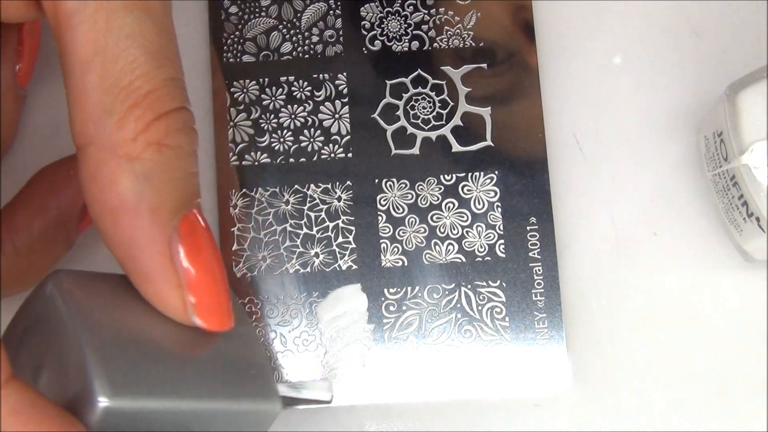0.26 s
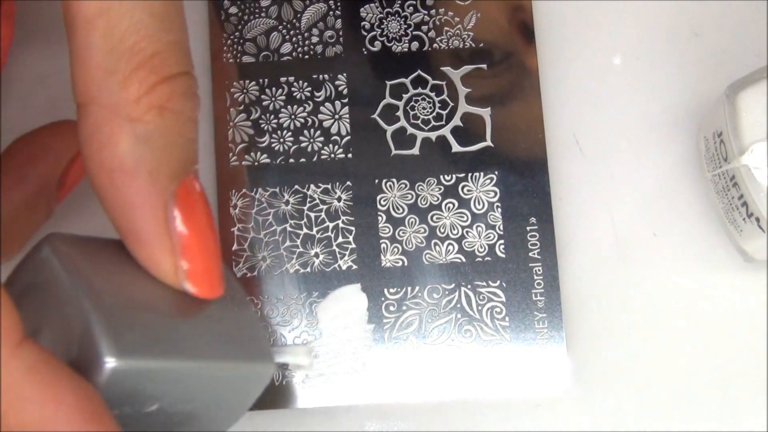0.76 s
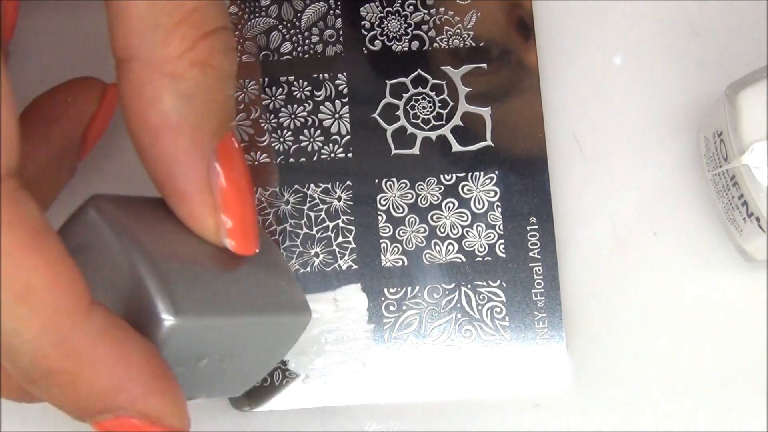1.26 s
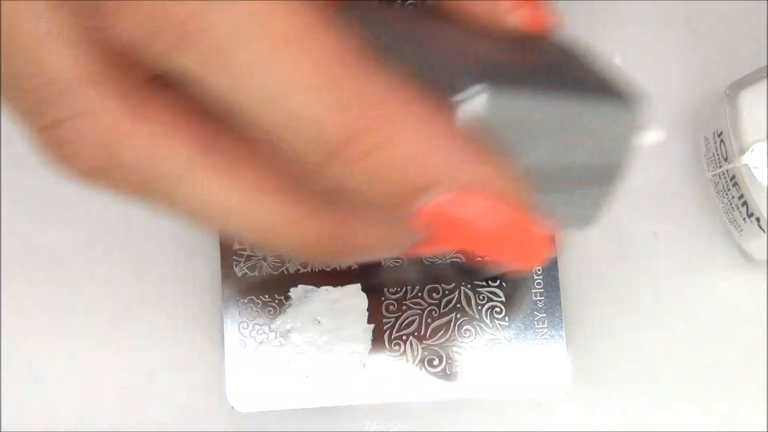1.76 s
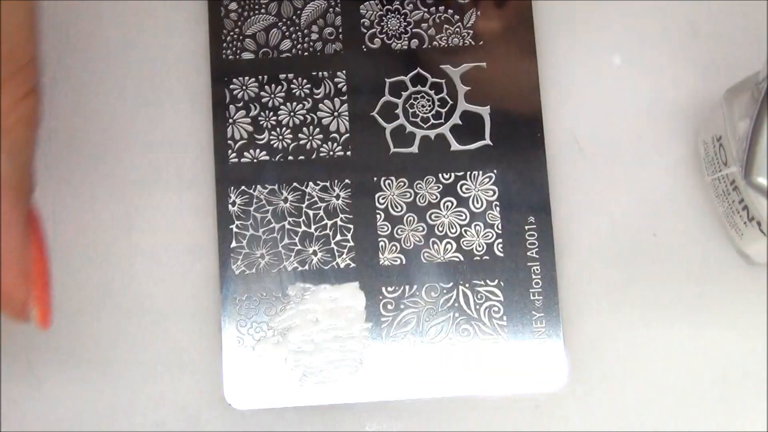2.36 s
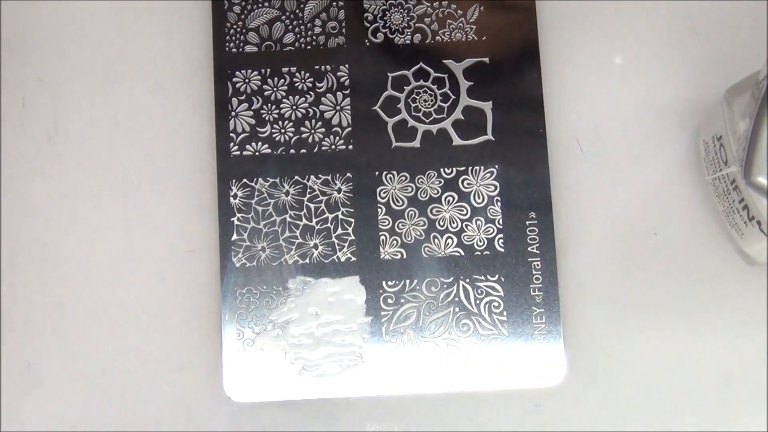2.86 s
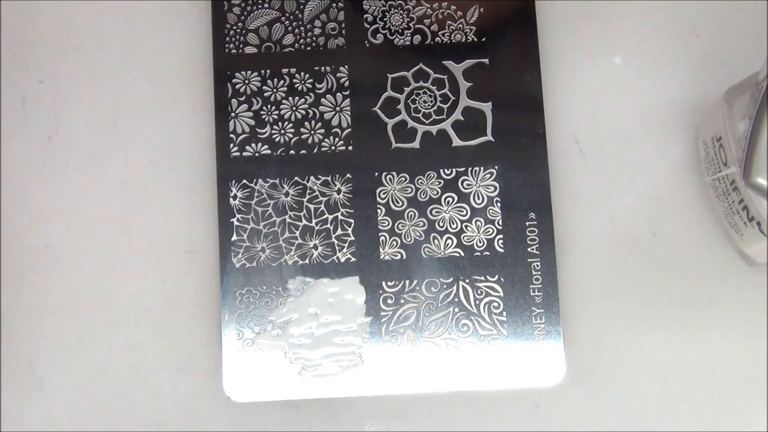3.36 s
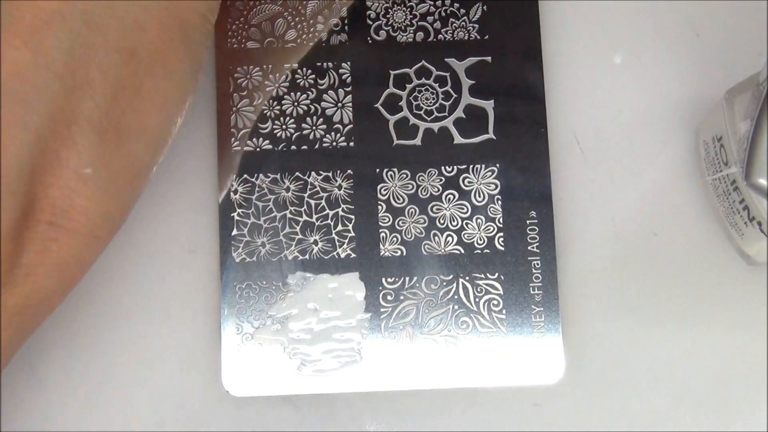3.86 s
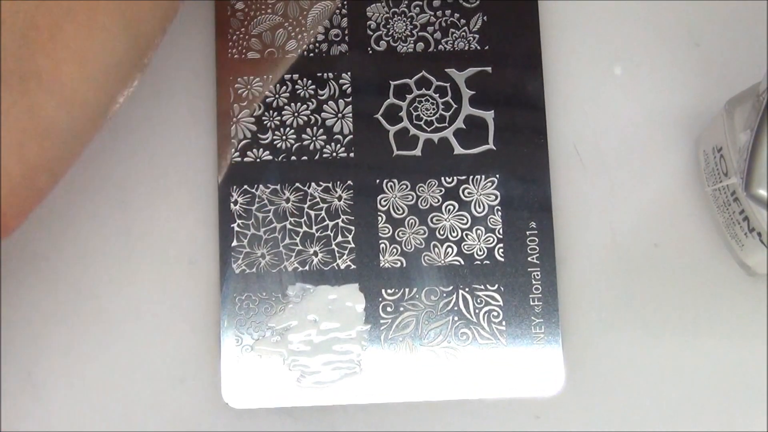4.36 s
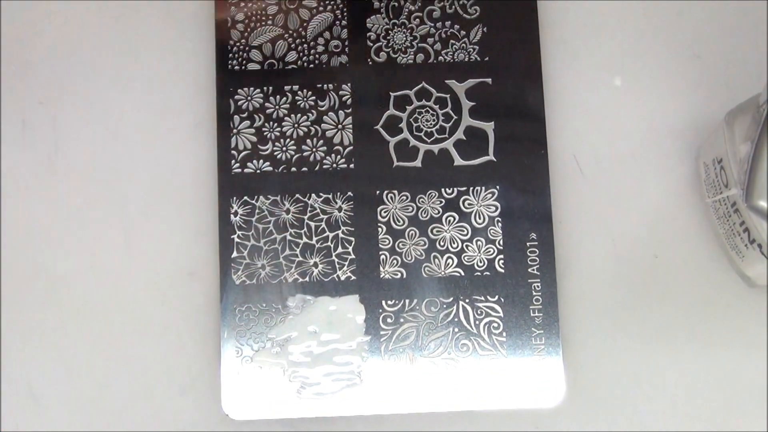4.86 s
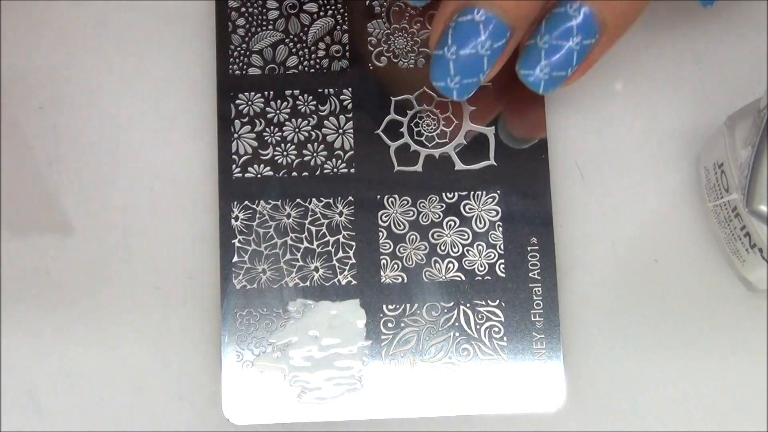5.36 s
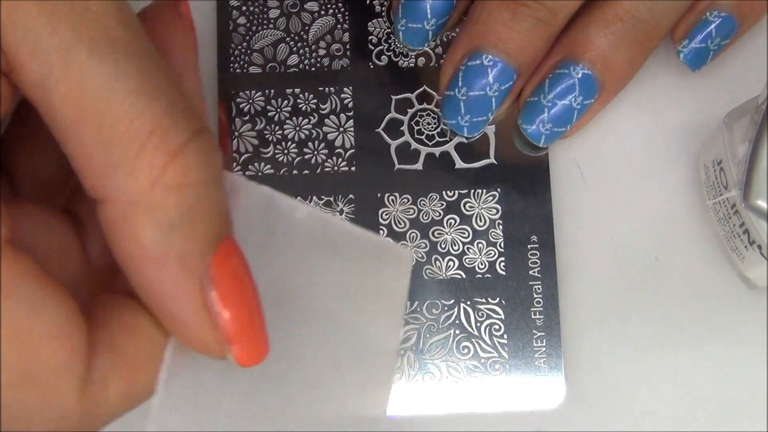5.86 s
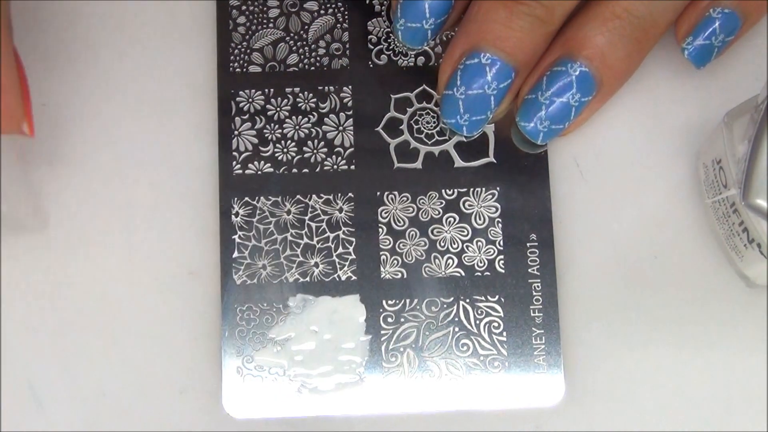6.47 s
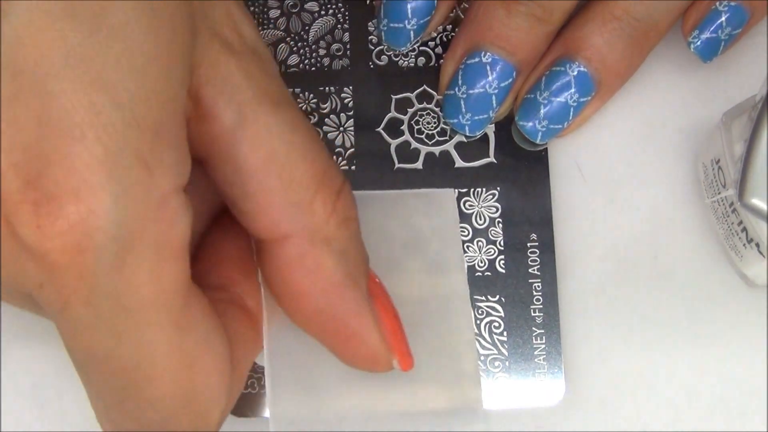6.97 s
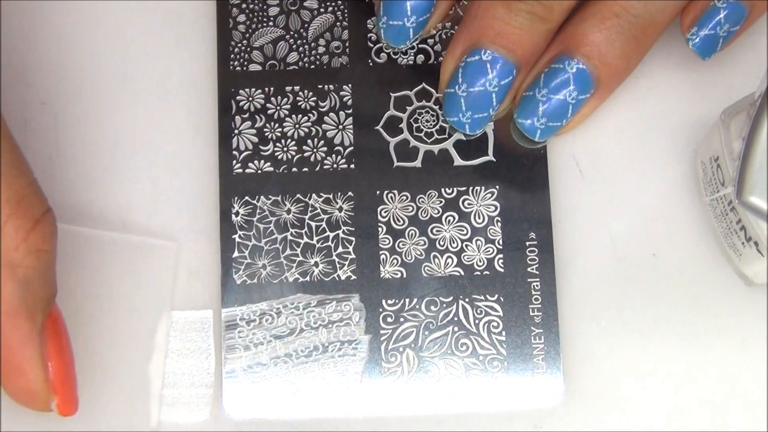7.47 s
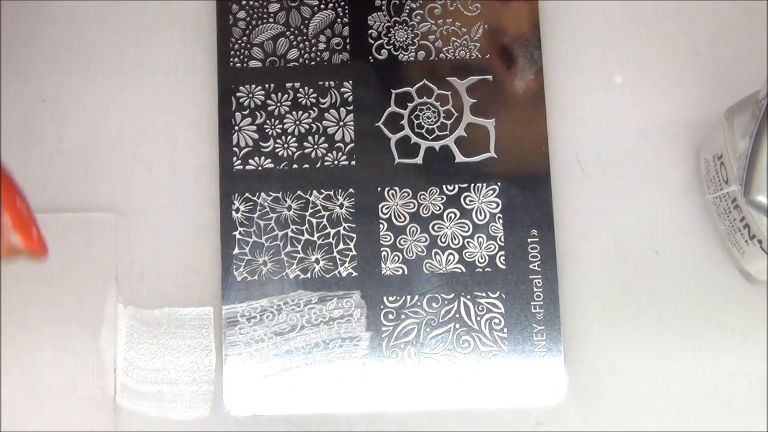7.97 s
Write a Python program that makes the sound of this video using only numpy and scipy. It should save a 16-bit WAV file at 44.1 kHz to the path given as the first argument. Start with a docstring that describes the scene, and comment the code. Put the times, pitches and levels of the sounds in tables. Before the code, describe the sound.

Over steady camera whir and hiss, faint brush-cap ticks lead to glass bottle knocks, busy plate clatter, then quiet and sharp scraping clicks.

```python
"""A camera motor whirs and ticks 25 times a second over a soft hiss; a brush cap then dabs a plate edge.
Bottle knocks, taps, scuffs, slides and scrapes follow: a plastic card on an engraved steel plate, at a desk.
Contacts are noise forces through plate, desk and card-edge resonances; blows also rock the desk.
Rubbing is random grit through the same bodies; the camera is shaped noise plus decaying sines."""
import sys
import numpy as np
from scipy import signal
from scipy.fft import rfft, irfft
from scipy.io import wavfile

SR = 44100
rng = np.random.default_rng(int(sys.argv[2]) if len(sys.argv) > 2 else 0)


def nominal_scale(level):
    """Amplitude ratio for a level in decibels (scalar or array-like)."""
    x = np.asarray(level, float) / 20
    return 10 ** x


def master_out(mix):
    """Clip the mix to full scale and print it as 16-bit PCM to the path in sys.argv[1]."""
    frames = np.transpose(np.atleast_2d(mix))
    ceiling = np.clip(frames, -1, 1)
    pcm = np.round(ceiling * 32767).astype(np.int16)
    wavfile.write(sys.argv[1], SR, pcm)


N = 362061

# hard contacts: start_s, peak_db, ring_hz, body_db re peak, sparkle_db re peak
TAPS = [(2.1654, -34, 2420, -6, -7), (2.466, -45, 2730, 12, 4), (2.5084, -26.5, 2770, 4, -13),
        (2.7635, -36, 1970, 16, -33), (2.8095, -28, 2030, -6, -25), (2.9103, -13, 3600, -6.5, -33),
        (2.9552, -19.5, 3230, -16, -8), (2.9671, -33, 3200, -10, -21), (2.9851, -18.5, 2960, -7, -32),
        (3.0044, -29, 3240, -14, -21), (3.2929, -25.5, 6100, -4.5, -6.5), (3.7504, -33, 6030, -23, 6),
        (3.8253, -12.5, 4350, -4, -10.5), (3.9395, -31, 3200, 1, -23), (4.0901, -35, 6560, -17, -16),
        (4.2436, -33, 2930, -3, -3), (4.3805, -14.5, 3000, -7, -14), (4.4934, -15.5, 4350, -7, -20),
        (4.5484, -18, 5860, -6, 0), (4.6744, -42, 6670, -20, 11), (4.6907, -37, 5000, -13, 11.5),
        (4.7064, -31, 2280, -20, -2), (4.811, -38.5, 6300, -22, 6), (5.1238, -34, 6600, -9, -7),
        (5.5436, -21, 1800, -18, -9), (6.4166, -10, 2720, -6, -29), (6.4238, -11.5, 2560, -7, -24),
        (6.4994, -39, 3760, -6, -21), (6.8821, -27, 1620, -9, -8), (6.9077, -41, 2160, -7, -18),
        (6.9631, -41, 2270, -11, -38), (7.179, -24, 2500, -7.5, -32), (7.2967, -37, 2570, -10, -22),
        (7.3153, -30, 2010, -17, -23), (7.3425, -31, 2620, -3.5, -19), (7.3671, -22, 2830, -15, -16),
        (7.3888, -9, 2830, -22, -6), (7.7478, -33, 6300, -23, -12), (7.9091, -14, 4360, -10, -6)]
# friction swells: peak_s, peak_db, ring_hz, body_db re peak, sparkle_db re peak, rise_s
SCUFFS = [(2.1878, -31.5, 5500, -20, 6.5, 0.0035), (2.505, -23, 1950, -6, -6.5, .01),
          (4.502, -15.5, 2600, -8, -20, 0.014), (4.549, -14.5, 5430, -12.5, -9, .012),
          (7.378, -14, 2830, -16, -29, .01), (7.84, -33, 2870, -6, -12, 0.0098),
          (7.856, -31.5, 2630, -6.5, -13, 0.0097), (8.085, -31, 5900, 3.5, -10, 0.02)]
# glass bottle knocks: start_s, peak_db, body_db re peak
CLINKS = [(2.1352, -15.5, -2), (2.2064, -17, -15), (2.2166, -16, -18)]
# brush cap on the plate edge: start_s, peak_db, upper_ring_db re peak
DABS = [(0.3844, -46, -9), (0.629, -41, -6), (0.8497, -39.5, 3), (1.072, -45, -6), (1.3026, -42, 3),
        (1.4965, -36.5, -8)]
# small hard parts ringing clear: start_s, peak_db, pitch_hz, t60_s
PINGS = [(2.766, -29.5, 2010, 0.1), (2.764, -30, 2700, .03), (3.751, -29, 10300, .04),
         (5.545, -33, 1950, 0.031), (7.91, -21, 4200, 0.01)]
# soft blows into the desk top: start_s, peak_db, ring_hz, deep_db re peak, judder_t60_s
THUMPS = [(2.133, -18, 440, -6, 0.029), (2.141, -16.5, 270, -30, 0.027), (2.159, -40, 240, 1, 0.064),
          (2.209, -25, 170, -10, 0.06), (2.239, -31, 170, -9, 0.07), (2.465, -33.5, 164, -12, 0.07),
          (2.507, -29.5, 410, -7, 0.058), (2.7, -37, 172, -16, 0.077), (2.764, -23, 236, -32, 0.059),
          (2.812, -16.5, 170, -19, 0.13), (2.825, -16, 168, -18, 0.17), (2.874, -28, 229, -15, 0.075),
          (2.91, -14.5, 224, -29, 0.08), (2.924, -14.5, 168, -23, 0.063), (2.953, -20.5, 227, -14, 0.07),
          (3.003, -36, 433, -20, 0.07), (3.003, -28, 217, -25, 0.087), (3.191, -28.5, 361, -32, 0.11),
          (3.244, -38, 230, -15.5, 0.11), (3.289, -28, 338, -33, 0.084), (3.314, -35, 175, -27, 0.076),
          (3.823, -17, 330, -35, 0.044), (3.859, -31, 232, -11, 0.054), (4.241, -31, 179, -30, 0.055),
          (4.378, -31, 388, -20, 0.059), (4.407, -29.5, 300, -14, 0.086), (4.447, -30, 308, -18, 0.079),
          (4.5, -26, 303, -19, 0.089), (4.549, -30, 320, -11, 0.063), (5.544, -42.5, 297, 1, 0.07),
          (6.416, -20, 433, -18, 0.14), (6.424, -21, 436, -15, 0.096), (6.439, -39, 299, -17, 0.07),
          (6.703, -48, 266, -17, 0.095), (6.878, -46, 388, -11, 0.07), (6.904, -50, 143, -2, 0.07),
          (7.135, -43, 369, -34, 0.058), (7.439, -46, 215, -17, 0.088), (7.461, -31, 233, -11, 0.19),
          (7.618, -45, 143, -4, 0.07), (7.663, -32, 253, -7, 0.1), (7.909, -27, 269, -27, 0.099),
          (7.958, -39.5, 267, -17, 0.054), (8.084, -34.5, 194, -6, 0.15)]
# hard edges over hard faces: peak_s, rise_s per 20 dB, fall_s per 20 dB, rasp_db, fizz_db (rms at the peak)
SCRAPES = [(2.166, .015, .03, -46, -42), (2.51, .012, .03, -33, -47), (2.558, .06, .09, -43.5, -46),
           (2.775, .012, .05, -45, -70), (2.93, .012, .025, -36, -66), (2.962, .012, .035, -32, -50),
           (3.004, .04, .045, -40.5, -68), (3.198, .08, .15, -53, -63), (3.31, .012, .025, -42, -61),
           (3.42, .12, .09, -48, -58), (3.84, .012, .035, -40, -52), (3.94, .03, .13, -33.5, -51),
           (4.042, .09, .045, -41, -64), (4.246, .02, .07, -41, -46), (4.515, .012, .015, -37, -54),
           (4.535, .012, .02, -34, -51), (4.565, .012, .06, -38, -49), (4.605, .03, .05, -52, -50),
           (4.715, .05, .09, -47, -46), (5.13, .07, .02, -50, -49), (5.646, .04, .08, -51, -49),
           (5.728, .07, .15, -51.5, -59), (6.072, .04, .04, -51, -52), (6.24, .05, .09, -56, -60),
           (6.435, .012, .025, -38, -57), (6.491, .09, .06, -49, -68), (6.89, .012, .045, -53, -62),
           (7.172, .13, .07, -47, -54), (7.33, .2, .1, -47.5, -62), (7.36, .03, .02, -44, -54),
           (7.4, .012, .04, -30, -34), (7.43, .05, .1, -34.5, -45), (7.745, .06, .09, -53, -58),
           (8.126, .02, .06, -54, -68)]
# weight shifting on the desk: peak_s, fall_s per 20 dB, drag_db, rumble_db, rocking_db (rms at the peak)
SHUFFLES = [(2.15, .03, -45, -38, -35), (2.17, .06, -46, -33, -35), (2.25, .11, -47, -35, -41),
            (2.475, .05, -42, -50, -54), (2.515, .06, -35, -40, -45), (2.56, .12, -52, -47, -54),
            (2.72, .09, -54, -43, -57), (2.775, .03, -37, -37, -55), (2.84, .03, -46, -32, -39),
            (2.89, .03, -60, -40, -50), (2.935, .02, -32, -29, -38), (2.965, .04, -42, -32, -40),
            (3.004, .11, -50, -38, -51), (3.08, .08, -50, -40, -50), (3.198, .11, -49, -34.5, -54),
            (3.31, .07, -40, -39, -52), (3.42, .11, -44, -40, -60), (3.84, .03, -32, -29, -38),
            (3.882, .05, -42, -36, -46), (3.95, .15, -43, -43, -59), (4.01, .15, -44, -41, -48),
            (4.14, .12, -50, -48, -58), (4.25, .09, -41, -38, -51), (4.33, .06, -52, -46, -56),
            (4.41, .08, -42, -39, -43), (4.48, .04, -53, -39, -48), (4.515, .02, -40, -34, -42),
            (4.529, .02, -31, -30, -34), (4.562, .08, -40, -38, -43), (5.69, .11, -58, -55, -65),
            (6.435, .035, -35, -31, -44), (6.455, .06, -46, -46, -39), (6.495, .07, -38, -42, -50),
            (6.91, .08, -52, -50, -49), (7.15, .09, -48, -45, -50), (7.24, .2, -45.5, -48, -57),
            (7.31, .09, -43, -45, -50), (7.345, .06, -41, -48, -52), (7.38, .04, -40, -42, -39),
            (7.43, .12, -43, -40, -46), (7.61, .09, -54, -48, -46), (7.668, .11, -49, -42, -41),
            (7.745, .08, -47, -42, -58), (7.925, .04, -46, -41, -53), (8.1, .05, -45, -44, -46),
            (8.14, .12, -52, -48, -53)]

# struck modes of the bottle: pitch_hz, relative_db, t60_s
BOTTLE_MODES = [(1560, -1.5, .028), (1800, -6, .022), (2380, 0, .027), (4200, -13, .011)]
# struck modes of the brush cap, lower and upper group: pitch_hz, relative_db, t60_s
CAP_LOW_MODES = [(2250, 0, .028), (2050, -6, .022)]
CAP_HIGH_MODES = [(5300, -5, .014), (6050, 0, .022), (9000, -4, .005)]
# steel plate resonances: center_hz, width_hz, relative_db
PLATE = [(2030, 1020, -4), (3010, 410, 0.5), (3990, 800, -4.5), (5900, 1100, -3.5), (7520, 6000, -13)]
# thin card edge resonances: center_hz, width_hz, relative_db
CARD_EDGE = [(10500, 1300, 0), (12000, 6000, -7)]
# desk surface under contact and drag: center_hz, width_hz, relative_db
DESK_SURFACE = [(550, 124, 2), (780, 56, 10), (1026, 123, 3.5), (1510, 384, -1.5)]
# desk top resonances: center_hz, width_hz, relative_db
DESK = [(111, 27, -2.5), (170, 35, -4.5), (235, 71.6, 2), (328, 87, 1), (398, 139, -4.5), (556, 236, -13.5)]
# the whole desk rocking on its legs: center_hz, width_hz, relative_db
LEGS = [(44.5, 9.1, 5), (85.5, 40, -1.5), (130, 50, 5)]

# background hiss spectrum, mid: freq_hz, relative_db per Hz
HISS = [(20, -35), (40, -10), (70, -16), (150, -7.5), (330, -12.5), (600, -9), (1000, -10), (1800, -12),
        (2300, -17), (4600, -17), (7000, -20), (9000, -20.5), (16000, -28.5)]
# background hiss spectrum, side: freq_hz, relative_db per Hz
HISS_SIDE = [(15, -32), (25, -2), (102, 2.5), (206, -4), (242, -2), (476, -6.5), (1100, -6), (4140, -32.5),
             (7310, -10.5), (14800, -37), (16000, -48)]
# camera body resonances under the whir: center_hz, width_hz, rms_db before waver
WHIR = [(48.5, 12, -67.5), (107, 17, -63.5), (250, 36, -64), (894, 62, -54), (1198, 79, -59),
        (1487, 47, -66), (4085, 220, -66), (7260, 490, -63), (12700, 250, -73), (15620, 60, -72)]
# level wander of the low whir: time_s, gain_db
WAVER = [(0, 0), (2.2, 1), (3.8, 2), (3.9, -1), (4.6, -4), (5.2, -5.5), (5.35, 2), (6.4, -1.5), (6.5, 2.5),
         (7.3, -2.5), (7.45, .4), (8.21, -2.2)]
# motor steps in each frame: offset_ms, ring_hz, t60_s, peak_db before lift and scatter
STEPS = [(-1.3, 7400, 0.035, -54), (22.5, 7300, 0.021, -51), (25.5, 7400, .01, -54),
         (4.5, 6470, 0.035, -52), (20.5, 5700, 0.012, -56), (9, 3400, 0.022, -60), (13.5, 4600, .02, -55),
         (33.5, 3400, 0.011, -56), (35.5, 2800, .02, -67)]
# pitch drift of one further motor step: time_s, ring_hz
CHIRP_HZ = [(0, 2700), (3.2, 2710), (4.2, 3000), (5.8, 3060), (6.4, 2800), (8.21, 2770)]
# that step: offset_ms, t60_s, peak_db before lift and scatter
CHIRP = (3, 0.033, -53.5)

# stereo lean of the desk sounds: freq_hz, left_minus_right_db
LEFT_LEAN = [(60, 8.0), (110, 7.0), (200, 5.5), (380, 3.5), (700, 0.5), (1290, 1.0), (2380, 0.0),
             (4400, 0.0), (8120, 0.0), (15000, 0.0)]
# close reflections: freq_hz, side_re_mid_db
SPREAD = [(60, -25), (600, -17), (2500, -16.5), (4500, -17), (7500, -2), (10000, -8), (15000, -22)]

# t60 of the slower part of a 0 dB tap's chatter; weaker taps settle sooner
CHATTER_T60_S, CHATTER_S_PER_DB = .05, .0005
SNAP_DB, SNAP_PER_SPARKLE = -5, .45  # first contact re tap peak; duller taps snap less
SHUFFLE_RISE = .45  # share of the fall time
ROOM_DB, ROOM_T60_S = -20.5, 0.32
HISS_DB, SIDE_DB, CAMERA_LEFT_DB = -51.5, -62, 0.8
FRAME_S, STEP_LIFT_DB, STEP_SCATTER_DB = .04, 1.1, 1.4
SINK_S, SINK_DB, CREEP_DB_PER_S = 6.43, -7.2, 1.6  # background level drops, then slowly climbs
LOW_CUT_HZ, TOP_HZ = 36.0, 15750


def on_log(table):
    """Reads a (Hz, dB) table over log frequency at every bin of the whole-length transform."""
    hz, db = np.transpose(table)
    return np.interp(np.log(np.fft.rfftfreq(N, 1 / SR) + 1), np.log(hz), db)


def unit(x):
    """Scales to rms 1."""
    return x / np.sqrt(np.mean(x ** 2))


def resonate(x, peaks):
    """Sums two-pole resonances (Hz, width Hz, dB) with alternating sign."""
    out = 0
    for k, (hz, width, db) in enumerate(peaks):
        b, a = signal.iirpeak(hz, hz / width, fs=SR)
        out = out + (-1) ** k * nominal_scale(db) * signal.lfilter(b, a, x)
    return out


def fade(t60_s, size):
    """Exponential decay, 60 dB in t60_s (at least 3 ms)."""
    return np.exp(-np.log(1000) * np.arange(size) / SR / max(t60_s, .003))


def noise_burst(t60_s, size):
    """Decaying white noise, the raw force of a juddering contact."""
    return rng.standard_normal(size) * fade(t60_s, size)


def ring(hz, t60_s, size):
    """A struck mode: one decaying sine."""
    return np.sin(2 * np.pi * hz * np.arange(size) / SR) * fade(t60_s, size)


def add(track, start_s, sound, peak_db):
    """Mixes in a sound scaled to the given peak."""
    i = max(int(start_s * SR), 0)
    sound = sound[:max(N - i, 0)]
    track[i:i + len(sound)] += nominal_scale(peak_db) * sound / (np.abs(sound).max(initial=0) + 1e-12)


def card_edge(force):
    """The thin card edge: a steep band of high resonances."""
    return resonate(resonate(force, CARD_EDGE), [(10300, 3700, 0)])


def add_contact(out, start_s, force, hz, plate, peak_db, body_db, sparkle_db):
    """One force rings the plate (boosted at the spot's pitch), the desk surface and the card edge."""
    metal = resonate(force, plate)
    add(out, start_s, metal + resonate(metal, [(hz, hz / 5.0, 5.0)]), peak_db)
    add(out, start_s, resonate(force, DESK_SURFACE), peak_db + body_db)
    add(out, start_s, card_edge(force), peak_db + sparkle_db)


def taps():
    """Hard taps: a sharp first contact, then chatter dying away."""
    out = np.zeros(N)
    for start_s, db, hz, body_db, sparkle_db in TAPS:
        t60_s = CHATTER_T60_S + CHATTER_S_PER_DB * db
        force = rng.standard_normal(6000) * (.45 * fade(t60_s, 6000) + fade(t60_s / 4, 6000))
        force[0] = 8
        snap_db = SNAP_DB + SNAP_PER_SPARKLE * min(sparkle_db, 0)
        add(out, start_s, np.diff(noise_burst(.004, 60)), db + snap_db)
        # plate modes lose 2 dB per octave away from the spot's pitch
        plate = [(f, width, d - 2.0 * abs(np.log2(f / hz))) for f, width, d in PLATE]
        add_contact(out, start_s, force, hz, plate, db, body_db, sparkle_db)
    return out


def scuffs():
    """Friction that builds linearly and lets go exponentially."""
    out, time = np.zeros(N), np.arange(6000) / SR
    for peak_s, db, hz, body_db, sparkle_db, rise_s in SCUFFS:
        gain = np.where(time < rise_s, time / rise_s, np.exp(-(time - rise_s) / (0.54 * rise_s)))
        force = gain * rng.standard_normal(6000)
        add_contact(out, peak_s - rise_s, force, hz, PLATE, db, body_db, sparkle_db)
    return out


def strike(modes, judder_t60_s):
    """All modes of one hand-held object, driven by a briefly juddering contact."""
    force = noise_burst(judder_t60_s, 600)
    force[0] = 3.1
    rings = sum(nominal_scale(db) * ring(hz, t60_s, 4000) for hz, db, t60_s in modes)
    return signal.fftconvolve(force, rings)


def bottle_knocks():
    """Glass modes over a noise burst through the desk surface."""
    out = np.zeros(N)
    for start_s, db, body_db in CLINKS:
        add(out, start_s, strike(BOTTLE_MODES, 0.023), db)
        add(out, start_s, resonate(noise_burst(0.077, 6000), DESK_SURFACE), db + body_db)
    return out


def cap_dabs():
    """Brush cap on the plate edge: lower and upper modes struck separately."""
    out = np.zeros(N)
    for start_s, db, upper_db in DABS:
        add(out, start_s, strike(CAP_LOW_MODES, 0.013), db)
        add(out, start_s, strike(CAP_HIGH_MODES, .01), db + upper_db)
    return out


def pings():
    """Small hard parts: one clear mode each."""
    out = np.zeros(N)
    for start_s, db, hz, t60_s in PINGS:
        add(out, start_s, ring(hz, t60_s, 9000), db)
    return out


def thumps():
    """A soft push with some judder rings its own pitch, the desk modes and the legs."""
    out = np.zeros(N)
    for start_s, db, hz, deep_db, t60_s in THUMPS:
        push = np.r_[np.zeros(60), np.hanning(50), .12 * noise_burst(t60_s, 9000)]
        own = resonate(push, [(hz, 3.5 / t60_s, 0)])
        add(out, start_s, unit(own) + 0.4 * unit(resonate(push, DESK)), db)
        add(out, start_s, resonate(push, LEGS), db + deep_db)
    return out


def grit(rate_hz, spread_db):
    """Random catches of an edge on a rough face: most small, a few large."""
    size = nominal_scale(spread_db * rng.standard_normal(N)) * rng.standard_normal(N)
    return size * (rng.random(N) < rate_hz / SR)


def swell(peak_s, rise_s, fall_s):
    """Sample slice and gain: up 20 dB in rise_s to the peak, down 20 dB in fall_s."""
    i = np.arange(int((peak_s - 3 * rise_s) * SR), min(int((peak_s + 3 * fall_s) * SR), N))
    late_s = i / SR - peak_s
    gain = nominal_scale(20 * np.minimum(late_s / max(rise_s, .003), -late_s / max(fall_s, .003)))
    return slice(i[0], i[-1] + 1), gain


def rub(rows, layers):
    """Swells steady layers of friction; overlapping moves add in power."""
    power = np.zeros((len(layers), N))
    for peak_s, rise_s, fall_s, *levels_db in rows:
        span, gain = swell(peak_s, rise_s, fall_s)
        power[:, span] += (nominal_scale(np.array(levels_db))[:, None] * gain) ** 2
    return sum(np.sqrt(p) * unit(x) for p, x in zip(power, layers))


def scrapes():
    """Dense grit through the steel plate (rasp) and the card edge (fizz)."""
    rasp = resonate(resonate(grit(4000, 2.2), PLATE), [(3200, 9000, 0)])
    fizz = card_edge(grit(6000, 4.4))
    return rub(SCRAPES, [rasp, fizz])


def shuffles():
    """Hands and objects shifting weight: grit through desk surface, desk top and legs."""
    drag = resonate(grit(4000, 0.67), DESK_SURFACE)
    rumble = resonate(grit(900, 1.34), DESK[1:])
    rocking = resonate(resonate(grit(900, 1.8), LEGS), [(93, 40, 0)])
    rows = [(peak_s, SHUFFLE_RISE * fall_s, fall_s, *levels) for peak_s, fall_s, *levels in SHUFFLES]
    return rub(rows, [drag, rumble, rocking])


def motor_steps():
    """Ticks repeating every frame: decaying sines with a soft onset, scattered in pitch and level."""
    out = np.zeros(N)
    onset = np.minimum(np.arange(1200) / 30, 1)
    offset_ms, t60_s, peak_db = CHIRP
    for frame_s in np.arange(0, N / SR, FRAME_S):
        drifting_hz = np.interp(frame_s, *np.transpose(CHIRP_HZ))
        for ms, hz, t60, db in STEPS + [(offset_ms, drifting_hz, t60_s, peak_db)]:
            detune, scatter = rng.standard_normal(2)
            tick = ring(hz * (1 + 0.008 * detune), t60, 1200) * onset
            add(out, frame_s + ms / 1000, tick, db + STEP_LIFT_DB + STEP_SCATTER_DB * scatter)
    return out


def motor_whir():
    """Noise through camera body resonances; those below 2 kHz waver in level."""
    out = np.zeros(N)
    waver = nominal_scale(np.interp(np.arange(N) / SR, *np.transpose(WAVER)))
    for hz, width, db in WHIR:
        narrow = [(hz, 1.44 * width, 0)]  # widened, as two passes narrow it
        tone = unit(resonate(resonate(rng.standard_normal(N), narrow), narrow))
        out += (waver if hz < 2000 else 1) * nominal_scale(db) * tone
    return out


def hiss(spectrum, rms_db):
    """Steady noise shaped to a spectrum."""
    return nominal_scale(rms_db) * unit(irfft(rfft(rng.standard_normal(N)) * nominal_scale(on_log(spectrum)), N))


def background():
    """Motor and hiss in stereo; their level drops once and partly recovers."""
    mid = hiss(HISS, HISS_DB) + motor_whir() + motor_steps()
    side = hiss(HISS_SIDE, SIDE_DB)
    time = np.arange(N) / SR
    settle = nominal_scale(np.where(time > SINK_S, SINK_DB + CREEP_DB_PER_S * (time - SINK_S), 0))
    return settle * np.array([nominal_scale(CAMERA_LEFT_DB) * mid + side, mid - side])


def room(near):
    """Adds a soft tail of decaying noise."""
    tail = noise_burst(ROOM_T60_S, 12000)
    return near + nominal_scale(ROOM_DB) * signal.fftconvolve(near, tail / np.linalg.norm(tail))[:N]


def two_ports(near):
    """Close reflections differ between the microphone ports; the bass leans left."""
    scatter = noise_burst(0.025, 800)
    spectrum = rfft(near)
    side = spectrum * rfft(scatter / np.linalg.norm(scatter), N) * nominal_scale(on_log(SPREAD))
    # tanh turns a left-right dB difference into a side/mid ratio
    side = side + spectrum * np.tanh(on_log(LEFT_LEAN) * np.log(10) / 40)
    side = irfft(side, N)
    return np.array([near + side, near - side])


def scene():
    """Desk sounds with their room tail, over the camera background."""
    contacts = taps() + scuffs() + bottle_knocks() + cap_dabs() + pings()
    near = contacts + thumps() + scrapes() + shuffles()
    return two_ports(room(near)) + background()


def band_limit(x):
    """A steep low-pass at the top of the band."""
    return signal.sosfilt(signal.butter(12, 16820, fs=SR, output="sos"), x)


def record(dry):
    """The microphone loses the deepest bass; the recorder cuts the top."""
    low_cut = signal.butter(4, LOW_CUT_HZ, "high", fs=SR, output="sos")
    top_cut = signal.ellip(10, .3, 40, TOP_HZ, fs=SR, output="sos")
    mix = signal.sosfilt(top_cut, signal.sosfilt(low_cut, dry))
    return band_limit(mix)


dry = scene()
out = record(dry)
master_out(out)
```